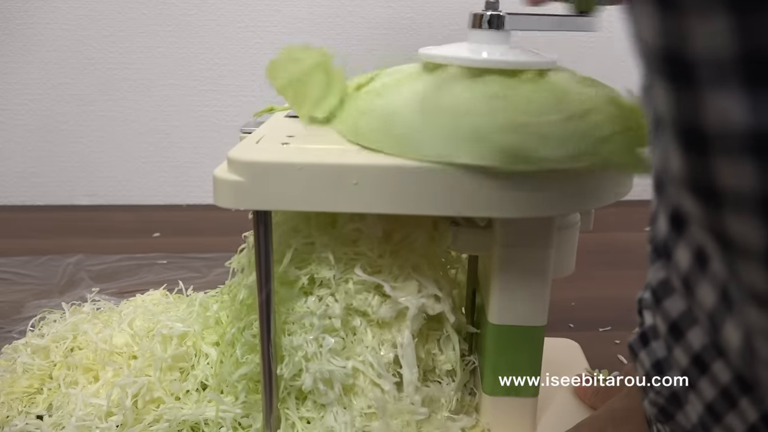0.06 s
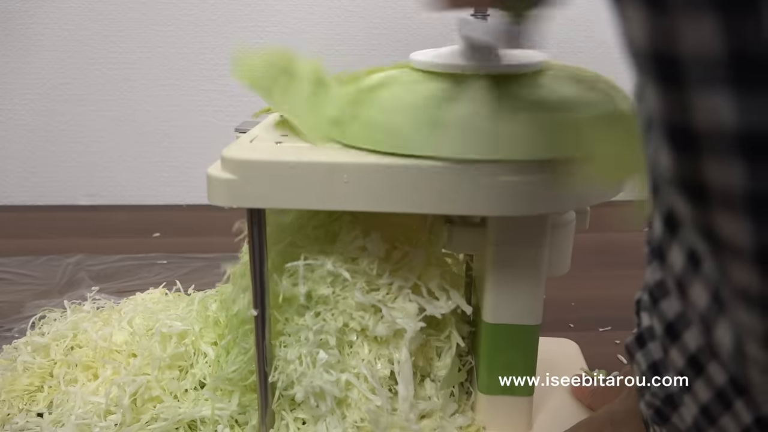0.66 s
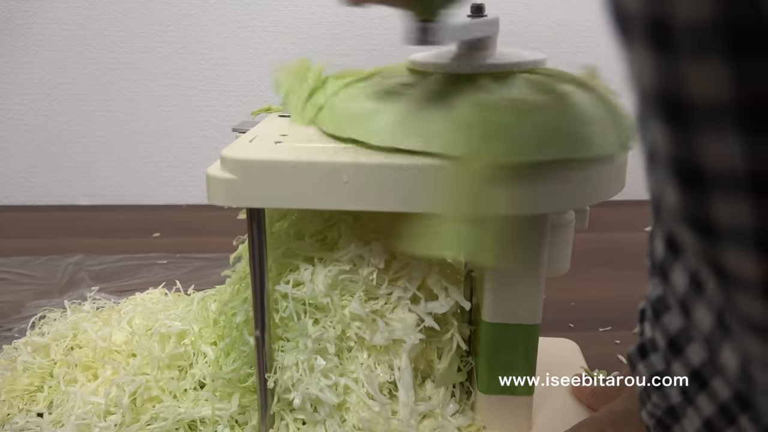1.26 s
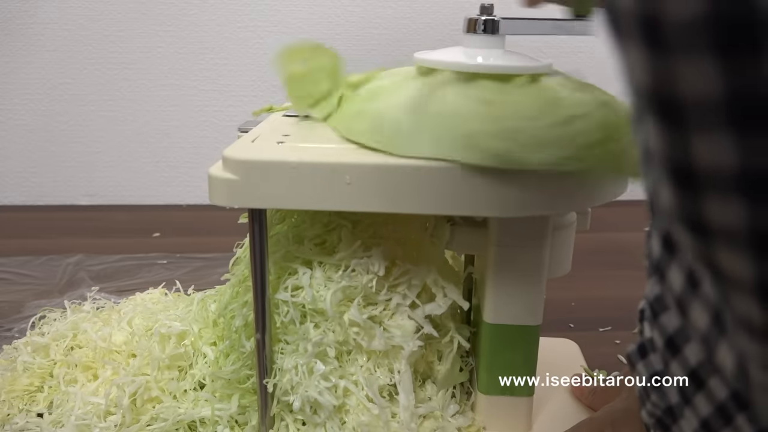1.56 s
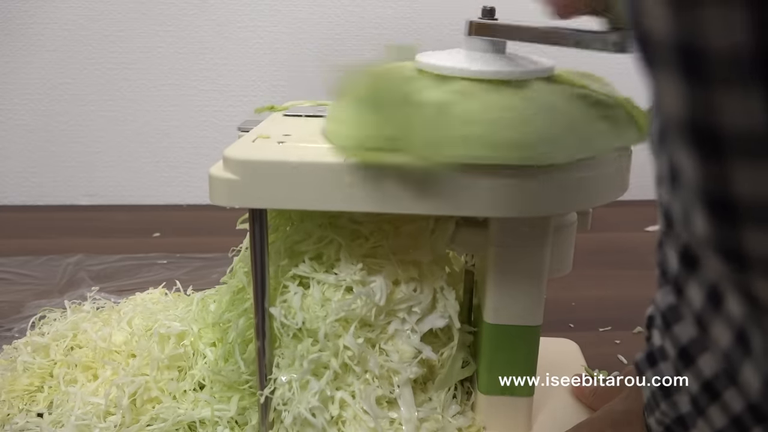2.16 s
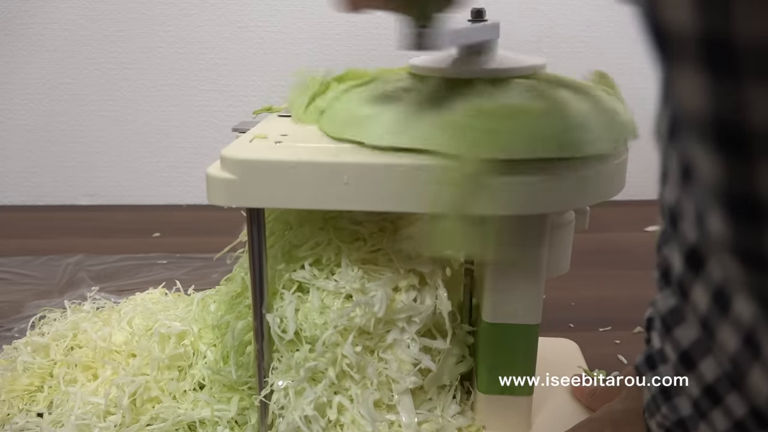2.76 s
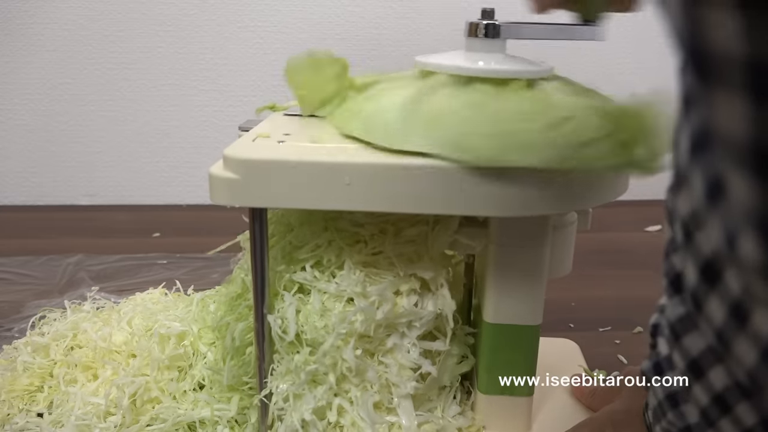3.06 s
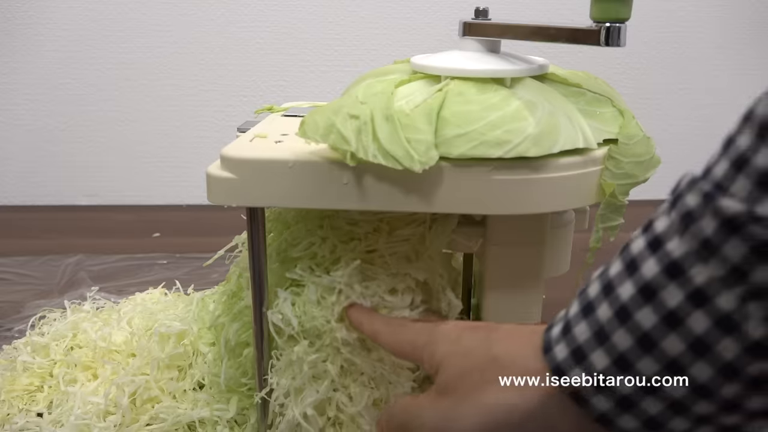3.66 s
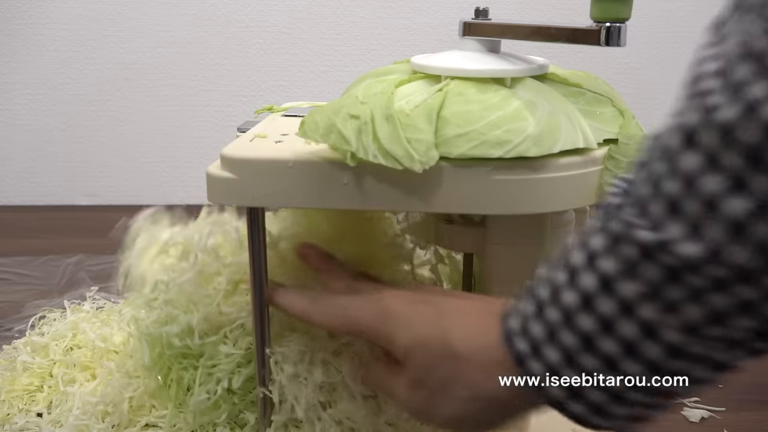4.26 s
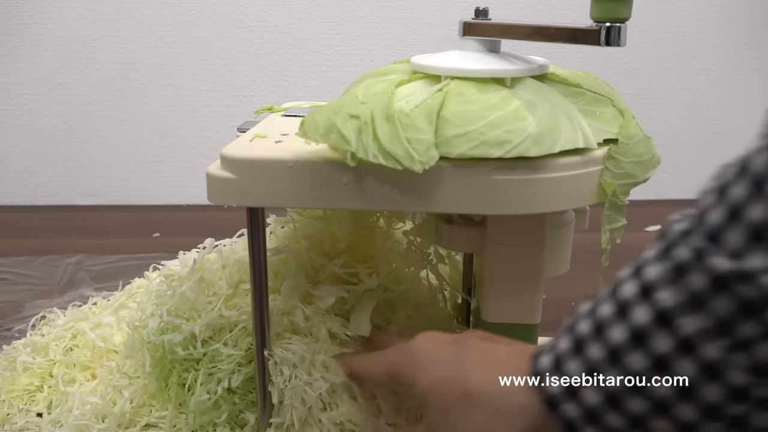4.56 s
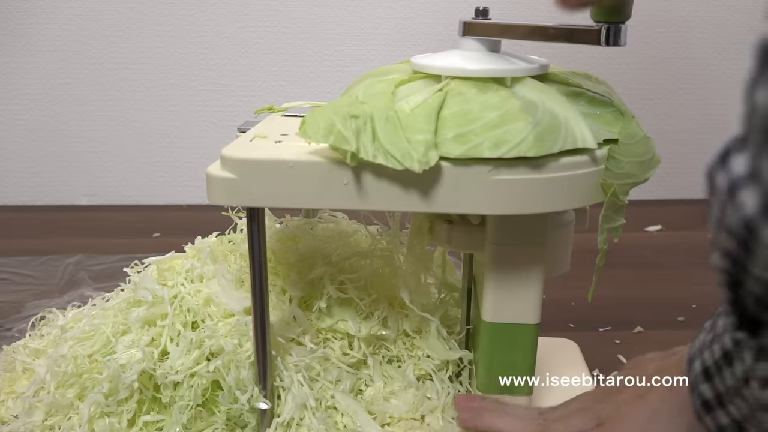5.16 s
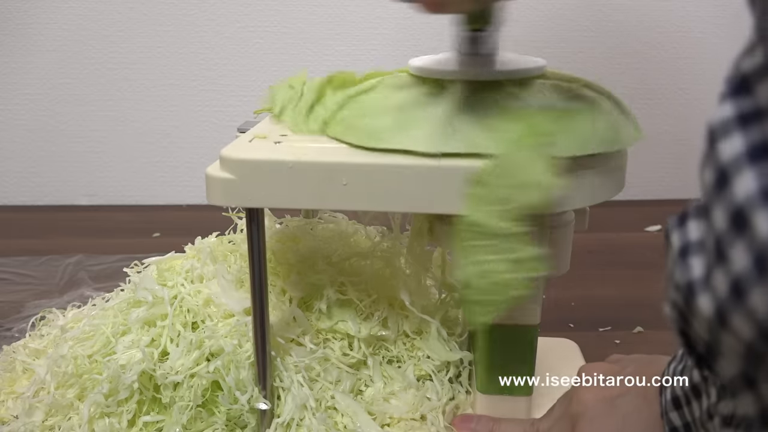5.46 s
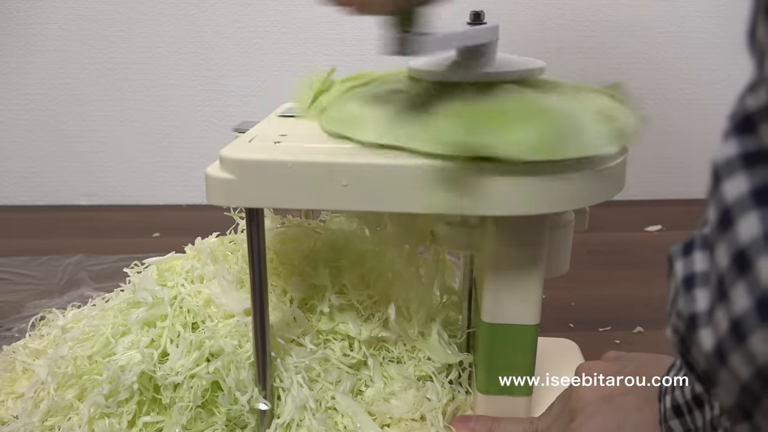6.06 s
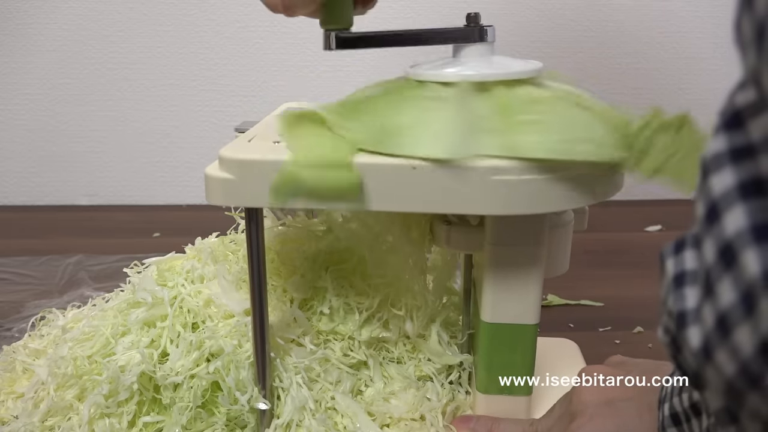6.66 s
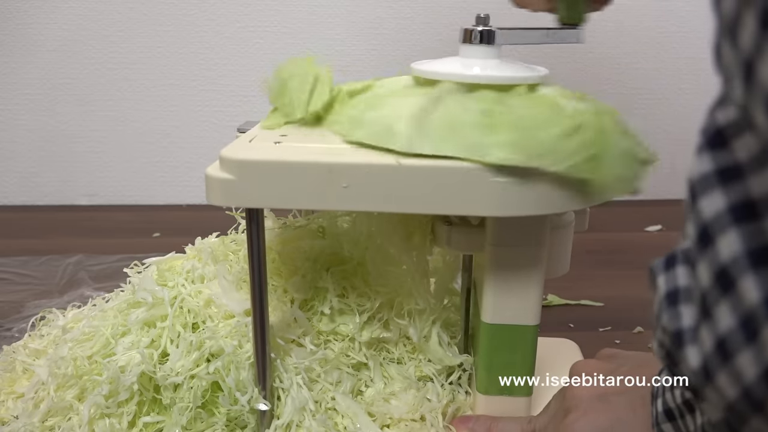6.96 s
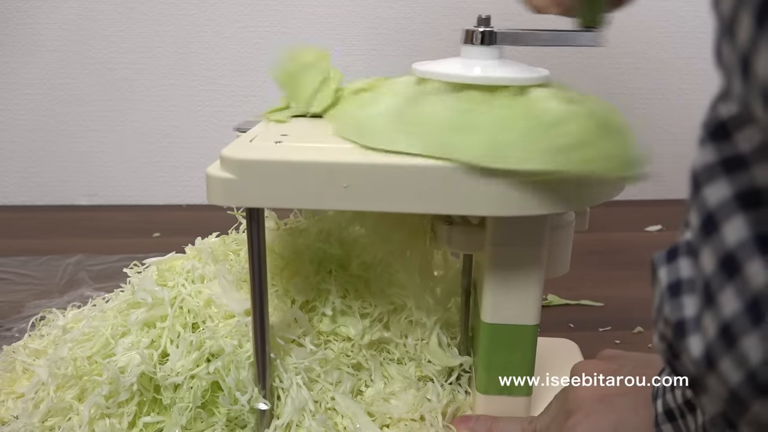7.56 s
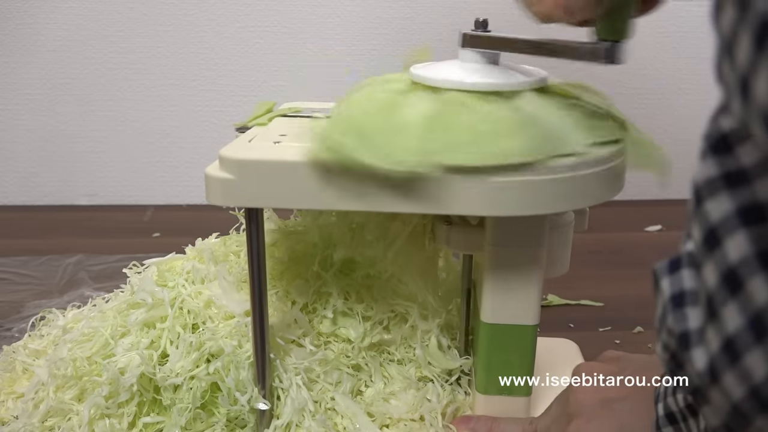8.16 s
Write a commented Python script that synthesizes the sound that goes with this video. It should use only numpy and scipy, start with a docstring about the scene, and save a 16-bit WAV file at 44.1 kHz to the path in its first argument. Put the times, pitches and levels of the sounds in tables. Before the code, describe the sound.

From the start, a hand-cranked slicer shreds a cabbage, loud and close in a small kitchen. About thirty quick cuts a second merge into a crisp, wet crunch with a fine fizz of juice. Underneath, the plastic frame rumbles, surging roughly twice a second and giving blunt knocks. Thick ribs crack now and then, wet leaves give tiny squeaks near 0.5 and 2 seconds, and the cabbage lands with a hollow clunk at 0.7 seconds.

At about 3.3 seconds the crank stops and a leaf scrapes softly to rest. Until 5.2 seconds there is only faint rustling as a hand pushes wet shreds aside, with a few small snaps and dull table bumps.

The slicing restarts around 5.3 seconds with a short squeak and is at full strength by 5.5. Crunching, sharp cracks, rumble and knocks continue until the end at about 8.4 seconds.

```python
"""Slicing cabbage with a hand crank

A hand-cranked slicer turns a cabbage over its blades, close by in a small kitchen. Each passing blade
makes a quick cut: cells burst, juice spits, thick ribs crack and wet leaves squeak. The plastic frame
rumbles, surges once a turn and knocks. The crank stops, a hand pushes the wet shreds aside, and the
slicing starts again."""
import sys
import numpy as np
from scipy import signal
from scipy.io import wavfile
from scipy.ndimage import uniform_filter1d, minimum_filter1d, map_coordinates

SR = 44100
rng = np.random.default_rng(int(sys.argv[2]) if len(sys.argv) > 2 else 0)


def unload_audio(sound):
    """Save the sound as a 16-bit wav file, at the path given as the first command line argument."""
    columns = np.transpose(np.atleast_2d(sound))
    # keep every value between -1 and 1, then stretch to whole-number steps
    steps = np.round(np.clip(columns, -1, 1) * 32767)
    wavfile.write(sys.argv[1], SR, steps.astype(np.int16))


N = 366912
T = np.arange(N) / SR
EDGE_HZ = 15780  # upper band limit

# modes of the loaded plastic frame: (frequency [Hz], energy [dB], t60 [s])
FRAME_MODES = [(230.4, 0.5, 0.063), (251.3, 1.5, 0.13), (296.8, -10, 0.44), (333.7, -6, 0.1),
               (386, -5, 0.041), (455, -4, 0.075), (495.5, -5.5, 0.034), (693, -10, 0.012)]
# sway of the stand on the table: (frequency [Hz], energy [dB], t60 [s])
STAND_MODES = [(48, -23, 0.033), (65.6, -6.5, .12), (107, -1.5, 0.057), (126.7, 0.5, 0.092),
               (190, -8, 0.083)]


def slicing(load_s=0.006, hush_db=-5):
    """Bursting cells crackle, ring the deck and spit juice; the same force jolts the frame, while the rumble
    rocks the stand."""
    # cracking leaf: (frequency [Hz], density [dB/Hz])
    crunch_spectrum = [(150, -17), (450, -7), (750, 1), (1200, 4.5), (1900, 1.5), (3200, -5), (3800, -2),
                       (5200, -10), (7500, -9.5), (10000, -16), (12000, -28.5), (15700, -39.5)]
    # blade deck: (frequency [Hz], energy [dB], t60 [s])
    deck_modes = [(858, -4, 0.0096), (1074, -6, 0.047), (1169, -2.5, 0.061), (1392, -5.5, 0.021),
                  (1790, -13.5, 0.022), (2445, -4, 0.012), (2756, -4.5, 0.036), (3116, -1, 0.0096),
                  (3417, -5.5, 0.034)]
    press, juice, rumble = pressure()
    cuts = blade_cuts(press)
    bite = fracture(cuts, tilt=-0.2)
    # a leaf bends quietly just before it breaks
    coming = np.interp(T + load_s, T, bite)
    uneven = clumps(per_s=190, depth_db=0.9) * amp(hush_db * coming / (coming + press + 1e-9))
    bed = amp(1.05) * press * uneven
    force = np.hypot(amp(-3) * bed, amp(1.5) * bite)
    crunch = amp(-2.5) * through(force * clicks(per_s=6500, spread_db=1), colour(crunch_spectrum))
    pings = amp(-4.5) * fibres(force)
    push = np.hypot(amp(-4.5) * bed, fracture(cuts, tilt=-0.032))
    deck = amp(-2.5) * through(push * clicks(per_s=3000, spread_db=5.5), ring(deck_modes))
    # juice keeps spitting between cuts
    spit = np.hypot(amp(-0.36) * juice * uneven, amp(-19) * fracture(cuts, tilt=2))
    return crunch + pings + deck + spray(spit) + frame_judder(rumble, bed, bite) + stand_sway(rumble)


def pressure(edge_s=0.015):
    """The head bears on the blades: gains of crunch, juice and rumble; lifts dip the first two."""
    # per spell of cranking: (time [s], crunch [dB], juice re crunch [dB], rumble re crunch [dB])
    spells = [
        [(0.0, -25.5, -7, -11.5), (0.06, -29, -7, -8.5), (0.4, -25, -12, -8.5), (0.47, -27, -8, -9.5),
         (0.74, -30, -11.5, -5), (0.83, -27.5, -10.5, -11), (1.1, -28.5, -4.5, -4.5), (1.38, -27.5, -12.5, -9),
         (1.5, -26.5, -8, -9), (1.9, -28.5, -7, -7.5), (2.07, -24.5, -7.5, -10), (2.38, -28, -12, -6.5),
         (2.6, -25.5, -9, -14), (2.84, -29.5, -7.5, -4.5), (2.91, -27, -11, -7), (3.05, -27, -3.5, -10),
         (3.18, -29, -9.5, -12), (3.33, -58.5, -21, -8)],
        [(5.2, -58, -18, 5), (5.26, -38.5, -10, -11), (5.36, -33.5, -10, -14), (5.45, -25, -8, -20),
         (5.52, -26.5, -10, -8.5), (5.91, -27.5, -8, -7.5), (6.17, -26, -8.5, -14.5),
         (6.39, -29.5, -10.5, -5.5), (6.7, -28, -4, -11.5), (6.8, -28.5, -4.5, -9), (7.06, -30.5, -4, -14),
         (7.18, -27, -6.5, -7.5), (7.35, -28.5, -7.5, -9), (7.45, -27.5, -6, -7), (7.84, -26.5, -9, -11),
         (7.9, -26, -13, -10), (8.04, -28, -7, -7), (8.31, -27, -10, -8)],
    ]
    # head bounces or hangs clear: (centre [s], length [s], level change [dB])
    lifts = [(0.718, .065, -1.5), (1.335, .04, -5.5), (2.83, 0.052, -1), (5.43, .045, -3.5),
             (6.985, 0.022, -6.5), (7.06, 0.029, -4.5)]
    press, juice, rumble = sum(np.array([level(s, db), level(s, db + juice_db), level(s, db + rumble_db)])
                               for s, db, juice_db, rumble_db in map(np.transpose, spells))
    dip_db = sum(db * np.clip((length / 2 - abs(T - s)) / edge_s + 0.5, 0, 1) for s, length, db in lifts)
    contact = amp(dip_db)
    return press * contact, juice * contact * clumps(per_s=9, depth_db=1.66), rumble


def blade_cuts(press, cut_s=0.0066, length_ratio=1.45, jitter_s=0.00091, spread_db=3.5):
    """One cut per passing blade, as strong as the pressure; an accent replaces any cut close to it."""
    # hard cuts through thick ribs, and one faint knock as the crank restarts:
    # (centre [s], level [dB], length [s], brightness [dB])
    accents = [(0.024, -25.5, 0.0053, -2), (0.164, -23.5, 0.0046, 3), (0.479, -22, 0.011, 7),
               (0.629, -21, 0.011, 3), (0.778, -27, 0.0043, -2), (0.845, -21, 0.0037, -4),
               (0.991, -23, 0.012, 7), (1.057, -24, 0.0043, 1), (1.197, -21.5, 0.012, 3.5),
               (1.277, -24.5, 0.0063, 0), (1.354, -25.5, .005, 4.5), (1.53, -20.5, 0.0068, 6.5),
               (1.798, -23.5, 0.006, 4), (1.956, -24.5, 0.0094, -6), (2.067, -22, 0.0055, 3),
               (2.253, -23, .006, 6), (2.674, -26, 0.0043, -4), (5.208, -40, 0.0035, 5.5),
               (5.266, -28.5, 0.0026, -5), (5.392, -26, 0.012, 3), (5.506, -21, 0.0053, -1),
               (5.651, -23.5, 0.0068, -7), (5.758, -23.5, 0.0087, -2), (5.799, -23, 0.011, 6),
               (5.876, -29, 0.009, 0), (6.072, -19, 0.0055, 5), (6.153, -21.5, 0.018, 5),
               (6.187, -20, 0.0077, 2), (6.732, -20, .004, -2), (7.011, -28, 0.0055, 7.5),
               (7.03, -24, 0.0037, 8.5), (7.082, -29, 0.0042, -3), (7.112, -26, 0.011, 6.5),
               (7.181, -21.5, 0.0044, 7.5), (7.321, -20, 0.015, 6), (7.406, -21, 0.0057, 1),
               (7.827, -20.5, 0.0056, -6), (8.01, -21.5, .01, 5.5), (8.086, -26.5, 0.0071, -5),
               (8.194, -23, 0.0083, 2)]
    # crank travel, per spell, about 30 blades/s: (time [s], blades passed [count])
    crank = [
        [(0.024, 0), (0.278, 9), (0.584, 19), (0.66, 22), (0.876, 29), (1.028, 33), (1.2, 38), (1.438, 44),
         (1.728, 53), (1.868, 57), (2.15, 66), (2.228, 68), (2.536, 78), (2.846, 87), (2.934, 90), (3.096, 95),
         (3.244, 99)],
        [(5.266, 0), (5.59, 8), (5.76, 13), (5.88, 16), (6.074, 22), (6.346, 31), (6.462, 34), (6.622, 39),
         (6.81, 44), (6.9, 46), (7.084, 49), (7.324, 56), (7.406, 59), (7.756, 70), (7.866, 73), (8.012, 78),
         (8.198, 83), (8.298, 86)],
    ]
    pass_s = np.concatenate([np.interp(np.arange(blades[-1] + 1), blades, s)
                             for s, blades in map(np.transpose, crank)])
    late, loud, long, bright = np.clip(rng.standard_normal((len(pass_s), 4)), -1.5, 1.5).T
    db = 20 * np.log10(np.interp(pass_s, T, press) + 1e-9) + 0.15 + spread_db * loud
    cuts = np.column_stack([pass_s + jitter_s * late, db, cut_s * length_ratio ** long, -0.1 * bright])
    plain = abs(pass_s[:, None] - np.array(accents)[:, 0]).min(axis=1) > 0.012
    return np.vstack([cuts[plain], accents])


def fracture(cuts, tilt, rise=0.6, fall=1.25):
    """Envelope of the cuts: each breaks fast and dies slower; positive tilt favours bright ones."""
    power = np.zeros(N)
    t = np.arange(-SR // 25, SR // 25) / SR
    for s, db, length_s, bright_db in cuts:
        swell = 0.5 ** ((2 * t / (length_s * np.where(t < 0, rise, fall))) ** 2)
        start = round((s + t[0]) * SR)
        add(power, start / SR, amp(db + tilt * bright_db) ** 2 * swell[max(-start, 0):])
    return np.sqrt(power)


def fibres(force, low_hz=950, high_hz=9500, decay_cycles=3.4, top_db=-8, count=28):
    """Each snapping fibre pings at its own pitch."""
    breaks = force * clicks(per_s=760, spread_db=2)
    which = rng.integers(0, count, N)
    out, t = np.zeros(N), T[:SR // 50]
    for k, (hz, db) in enumerate(zip(np.geomspace(low_hz, high_hz, count), np.linspace(0, top_db, count))):
        ping = unit(np.sin(2 * np.pi * hz * t) * np.exp(-hz * t / decay_cycles))
        out += amp(db) * through(breaks * (which == k), ping)
    return out


def spray(strength):
    """Juice spits in tiny spurts, each droplet size in its own band and at its own moments."""
    # juice fizz: (frequency [Hz], density [dB/Hz])
    fizz_spectrum = [(1500, -13), (4000, 1), (6000, -1.5), (8500, -3.5), (10500, -7), (12000, -14),
                     (15700, -28)]
    # band edges, large droplets to small: (frequency [Hz])
    edges_hz = [1500, 5200, 6800, 8700, EDGE_HZ]
    droplets = through(strength * clicks(per_s=4000, spread_db=4), colour(fizz_spectrum))
    return sum(clumps(per_s=170, depth_db=2.4) * band(droplets, low_hz, high_hz, order=4)
               for low_hz, high_hz in zip(edges_hz, edges_hz[1:]))


def frame_judder(rumble, bed, bite):
    """The frame shakes, surging once a turn under the head's heavy side; cuts jolt its higher modes."""
    # surges: (peak time [s], level [dB], length [s])
    turns = [(0.373, -23.5, 0.085), (0.82, -23.5, 0.063), (1.387, -26, 0.048), (1.882, -25, 0.13),
             (2.404, -32, 0.069), (2.918, -23, 0.076), (5.637, -24.5, 0.071), (6.201, -25, 0.14),
             (6.69, -26.5, 0.27), (7.358, -24, 0.13), (7.876, -22.5, 0.14), (8.31, -24, 0.049)]
    power = (amp(2) * rumble) ** 2
    for s, db, length_s in turns:
        swell = np.exp2(-np.minimum((2 * (T - s) / length_s) ** 2, 20))
        power += amp(db) ** 2 * swell * (abs(T - s) < 2 * length_s)
    shake = band(np.sqrt(power) * clicks(per_s=1100, spread_db=1.5), low_hz=190.4, high_hz=366)
    force = np.hypot(amp(-2.5) * bed, amp(0.5) * bite)
    jolts = band(force * clicks(per_s=3000, spread_db=3), low_hz=396, high_hz=910)
    return through(shake + jolts, ring(FRAME_MODES))


def stand_sway(rumble):
    """Cranking rocks the stand on the table."""
    drive = amp(2.5) * rumble * clumps(per_s=30, depth_db=0.5) * clicks(per_s=900, spread_db=1.5)
    return through(drive, ring(STAND_MODES))


def knocks(decay_s=0.00093, ring_db=-5, blow_db=-4):
    """A blunt, damped blow rings the frame, mostly near the pitch of the blow."""
    # cabbage or hand bumps the frame: (time [s], level [dB], pitch [Hz])
    blows = [(0.338, -13, 248), (0.627, -13.5, 455), (1.275, -15, 315), (1.41, -13, 242),
             (2.427, -13.5, 234), (2.676, -10, 472), (2.726, -14, 241), (3.376, -34, 382),
             (5.092, -39, 360), (5.118, -41, 363), (5.205, -35, 440), (5.553, -15.5, 505),
             (5.594, -10.5, 242), (5.66, -10, 240), (6.143, -10.5, 242), (6.202, -10.5, 240),
             (6.665, -15, 242), (6.731, -11.5, 266), (7.01, -16, 452), (7.289, -12, 250), (7.362, -16, 255),
             (7.498, -17, 237), (7.846, -11, 244), (7.906, -11, 242), (8.296, -15, 259)]
    out, t, frame = np.zeros(N), T[:SR // 3], ring(FRAME_MODES)
    for s, db, hz in blows:
        blow = np.sin(2 * np.pi * hz * t) * np.exp(-t / decay_s)
        boom = band(signal.fftconvolve(blow, frame)[:len(t)], 0.75 * hz, 2 * hz)
        add(out, s, amp(db) * (amp(blow_db) * blow + amp(ring_db) * boom / abs(boom).max()))
    return out


def head_drops(thud_db=-7):
    """The head lands on the deck with a hollow clunk, thuds the stand and bounces."""
    # landings: (time [s], level [dB])
    landings = [(.686, -8.5), (0.702, -20.5), (.721, -13.5)]
    # hollow cabbage head: (frequency [Hz], energy [dB], t60 [s])
    head_modes = [(150, -10, .1), (242, 0.5, 0.17), (320, -1.5, 0.055), (468, -8.5, .09), (613, -6.5, .07),
                  (814, -11, .08), (1102, -13, .08)]
    out, head, stand = np.zeros(N), ring(head_modes), ring(STAND_MODES)
    clunk = head / abs(head).max() + amp(thud_db) * stand / abs(stand).max()
    for s, db in landings:
        add(out, s, amp(db) * clunk)
    return out


def snaps(decay_s=0.0016):
    """A crisp fibre or shred breaks with a short, bright crack."""
    # breaks: (time [s], peak [dB])
    breaks = [(2.0542, -14), (2.3364, -15), (3.471, -37), (3.485, -37), (3.495, -27), (4.2917, -42),
              (4.355, -42), (4.385, -33), (4.5336, -40), (5.205, -38), (5.241, -38), (5.557, -12),
              (5.9205, -18), (7.0199, -15), (7.824, -13), (8.0107, -14)]
    out, t = np.zeros(N), T[:SR // 100]
    for s, db in breaks:
        burst = rng.standard_normal(len(t)) * np.exp(-t / decay_s)
        crack = band(burst, low_hz=900, high_hz=9800, order=3)
        add(out, s, amp(db) * crack / abs(crack).max())
    return out


def squeaks(jitter=0.024):
    """A wet leaf sticks and slips on the deck: short unsteady tones with a weaker octave."""
    # slips: (start [s], length [s], start pitch [Hz], end pitch [Hz], level [dB], octave [dB])
    slips = [(.475, .010, 5200, 4900, -18, -21), (.482, .017, 4890, 4880, -18, -20),
             (.497, .008, 4920, 4950, -23, -18), (1.959, .015, 3950, 4150, -26, -20),
             (1.972, .009, 4400, 4480, -28, -20), (5.342, .03, 1260, 1400, -33, -7),
             (5.372, .028, 1250, 1400, -26, -4), (7.583, .013, 1450, 1410, -25, -14),
             (7.604, .016, 1470, 1470, -22, -12)]
    out, waver = np.zeros(N), 1 + jitter * wander(per_s=670)
    for s, length_s, start_hz, end_hz, db, octave_db in slips:
        size = round(length_s * SR)
        hz = np.linspace(start_hz, end_hz, size) * waver[round(s * SR):][:size]
        phase = 2 * np.pi * np.cumsum(hz) / SR
        tone = np.sin(phase) + amp(octave_db) * np.sin(2 * phase)
        add(out, s, amp(db) * signal.windows.tukey(size, 0.5) * tone)
    return out


def leaf_scrape():
    """A loose leaf scrapes to rest on the deck."""
    # friction envelope: (time [s], level [dB])
    slide = [(3.3, -72), (3.335, -60), (3.365, -56), (3.39, -64), (3.42, -71)]
    # leaf friction: (frequency [Hz], density [dB/Hz])
    leaf_spectrum = [(1000, -22), (2600, -14), (3700, -13), (4700, -25), (10000, -35)]
    return through(level(*np.transpose(slide)) * clicks(per_s=3100, spread_db=8), colour(leaf_spectrum))


def hand(attack_s=0.02, release_s=0.039):
    """With each move of the hand, loose shreds rustle and the table is nudged."""
    # moves while the crank rests: (start [s], length [s], rustle [dB], bump [dB])
    moves = [(3.303, .08, -64, -46), (3.435, .14, -64, -53.5), (3.73, 0.55, -74, -81),
             (4.281, 0.013, -56, -64), (4.374, .13, -59.5, -68), (4.41, 0.023, -63, -58),
             (4.486, 0.041, -67, -48), (4.6, 0.13, -80, -59), (4.75, 0.037, -72, -65),
             (5.079, 0.054, -61.5, -72), (5.164, .08, -60, -56)]
    # loose shreds: (frequency [Hz], density [dB/Hz])
    shred_spectrum = [(100, 1), (400, 8), (900, 7.5), (1800, 0), (4000, -0.5), (8000, 3), (11000, -2),
                      (15700, -21)]
    # dull table bumps: (frequency [Hz], density [dB/Hz])
    bump_spectrum = [(20, -8.5), (50, -4), (100, -6.5), (180, -18), (400, -18), (1200, -54)]
    rustle, bump = np.zeros((2, N))
    for s, length_s, rustle_db, bump_db in moves:
        stroke = np.clip((T - s) / attack_s, 0, 1) * np.exp(-np.maximum(T - s - length_s, 0) / release_s)
        rustle += amp(rustle_db) * stroke
        bump += amp(bump_db) * stroke
    rustle *= amp(5) * clumps(per_s=61, depth_db=3.5) * clicks(per_s=5500, spread_db=3)
    bump *= amp(-3) * clicks(per_s=630, spread_db=5.5)
    return through(rustle, colour(shred_spectrum)) + through(bump, colour(bump_spectrum))


def kitchen(x, taps_per_s=2500, predelay_s=0.004):
    """Sparse reflections, each band dying at its own rate."""
    # room decay: (frequency [Hz], t60 [s])
    room_t60 = [(100, 0.16), (500, .22), (2000, 0.46), (8000, 0.058), (15000, 0.037)]
    size = SR // 2
    taps = rng.choice([-1., 1.], size) * (rng.random(size) < taps_per_s / SR) * (T[:size] > predelay_s)
    hz, t, spectra = signal.stft(taps, SR, nperseg=256)
    decay = np.exp(-np.log(1000) * t / read(room_t60, hz)[:, None])
    tail = signal.istft(spectra * decay, SR, nperseg=256)[1]
    return through(x, unit(tail))


def room_tone(rms_db=-64.5):
    """Faint, steady noise, strongest in the bass."""
    # quiet kitchen: (frequency [Hz], density [dB/Hz])
    room_spectrum = [(15, -32), (25, -2), (69, -2), (274, -14), (445, -9), (567, -20.5), (762, -13),
                     (826, -16.5), (1570, -22), (3830, -23.5), (7700, -23.5), (14300, -33.5), (15500, -26)]
    return amp(rms_db) * through(rng.standard_normal(N), colour(room_spectrum))


def amp(db):
    """Decibels to gain."""
    return 10 ** (np.asarray(db) / 20)


def unit(x):
    """Scales to energy 1."""
    return x / np.linalg.norm(x)


def read(points, hz):
    """Reads a table on a log-frequency axis."""
    table_hz, value = np.transpose(points)
    return np.interp(np.log(hz + 1), np.log(table_hz), value)


def level(s, db):
    """A dB curve as a smoothed gain, silent outside its span."""
    return uniform_filter1d(amp(np.interp(T, s, db)) * (T >= s[0]) * (T <= s[-1] + 0.01), size=200)


def add(mix, s, sound):
    """Adds a sound at time s."""
    part = mix[max(round(s * SR), 0):][:len(sound)]
    part += sound[:len(part)]


def through(x, response):
    """Plays x through an impulse response."""
    return signal.oaconvolve(x, response)[:N]


def band(x, low_hz, high_hz, order=2):
    """Butterworth band-pass."""
    return signal.sosfilt(signal.butter(order, [low_hz, high_hz], "band", fs=SR, output="sos"), x)


def colour(spectrum, size=4096):
    """Minimum-phase response of energy 1 with the given spectral shape."""
    log_gain = np.log(amp(read(spectrum, abs(np.fft.fftfreq(size, 1 / SR)))))
    return unit(np.fft.ifft(np.exp(np.conj(signal.hilbert(log_gain)))).real[:size // 2])


def ring(modes):
    """Response of energy 1 of dying modes, alternating in sign; little radiates below the lowest."""
    t = T[:SR // 3]
    swing = sum((-1) ** k * amp(db) * unit(np.sin(2 * np.pi * hz * t) * np.exp(-np.log(1000) * t / t60))
                for k, (hz, db, t60) in enumerate(modes))
    return unit(band(swing, 0.63 * modes[0][0], EDGE_HZ))


def clicks(per_s, spread_db):
    """Random clicks of rms 1: many small, a few large."""
    size = amp(spread_db * np.minimum(rng.exponential(1, N), 3.2))
    train = size * rng.choice([-1, 1], N) * (rng.random(N) < per_s / SR)
    return train / train.std()


def wander(per_s):
    """Random curve of spread 1 with per_s turning points a second."""
    return map_coordinates(rng.standard_normal(N // 20), [T * per_s], order=1) * np.sqrt(3 / 2)


def clumps(per_s, depth_db):
    """Uneven gain of rms 1."""
    gain = amp(depth_db * wander(per_s))
    return gain / np.sqrt(np.mean(gain ** 2))


def scene():
    """Slicer and hand, room tone and reflections; mono."""
    near = slicing() + knocks() + head_drops() + snaps() + squeaks() + leaf_scrape() + hand()
    return (near + room_tone() + amp(-20.5) * kitchen(near))[None]


def record(dry, ceiling_db=-10, recover_db_per_s=130):
    """A peak limiter holds the hardest blows down; then the band limit."""
    over_db = np.maximum(20 * np.log10(abs(dry[0]) + 1e-9) - ceiling_db, 0)
    fall_db = T * recover_db_per_s
    held_db = np.maximum.accumulate(over_db + fall_db) - fall_db
    gain = uniform_filter1d(minimum_filter1d(amp(-held_db), size=45), size=45)
    lowpass = signal.firwin(511, EDGE_HZ, window=("kaiser", 9), fs=SR)
    return signal.oaconvolve(dry * gain, lowpass[None], "same")


dry = scene()
out = record(dry)
unload_audio(out)
```